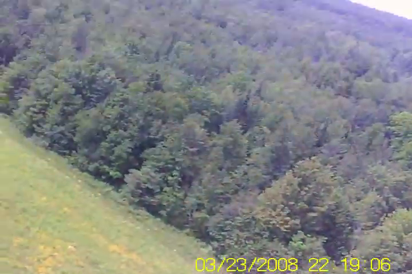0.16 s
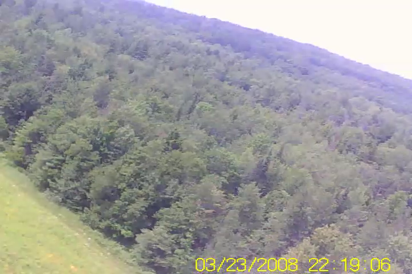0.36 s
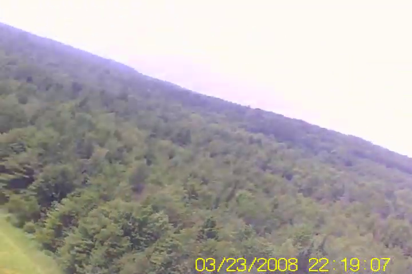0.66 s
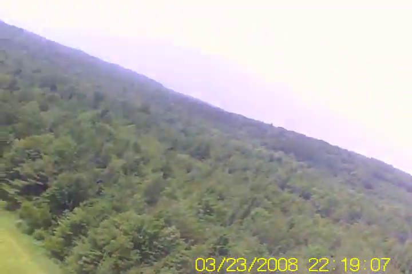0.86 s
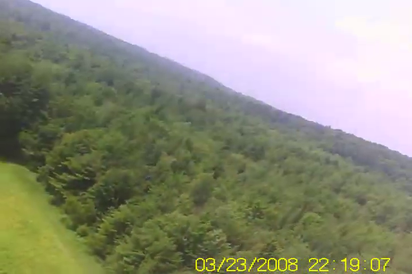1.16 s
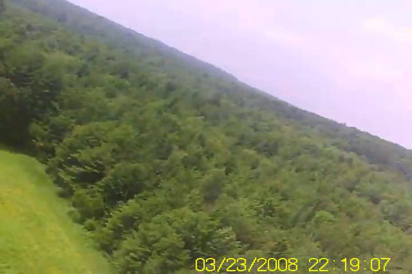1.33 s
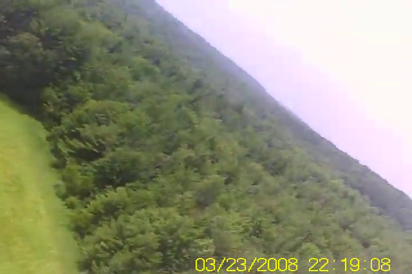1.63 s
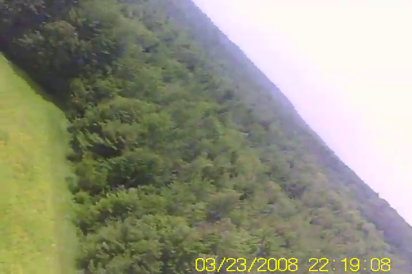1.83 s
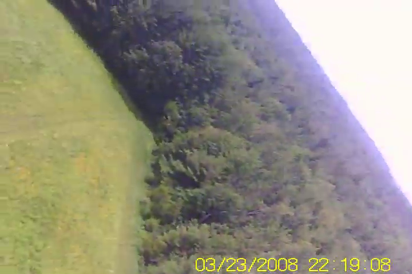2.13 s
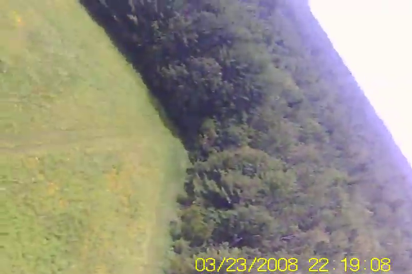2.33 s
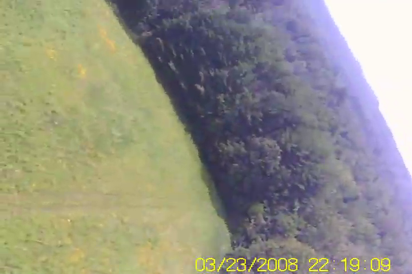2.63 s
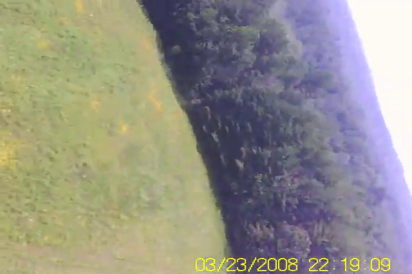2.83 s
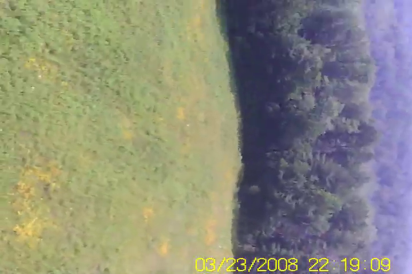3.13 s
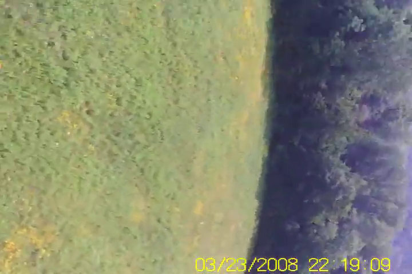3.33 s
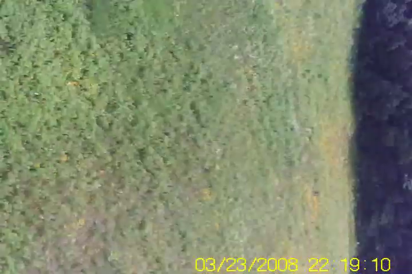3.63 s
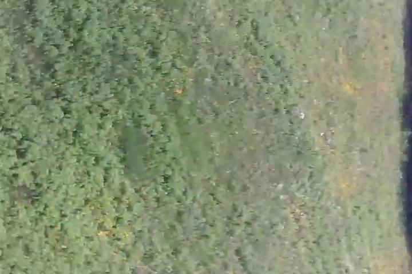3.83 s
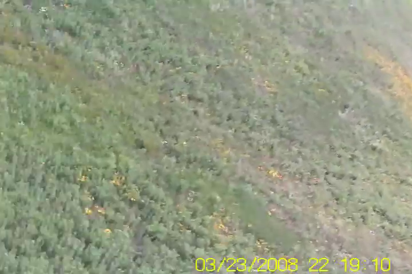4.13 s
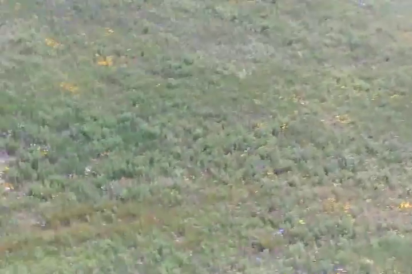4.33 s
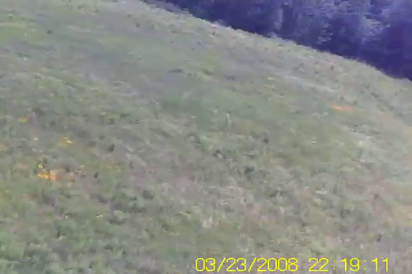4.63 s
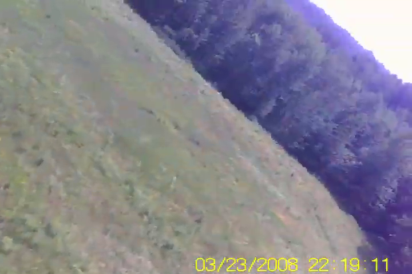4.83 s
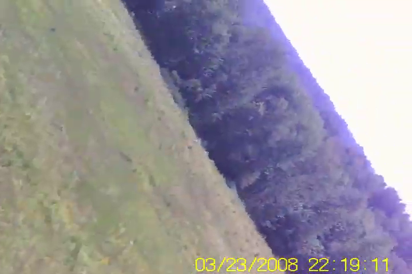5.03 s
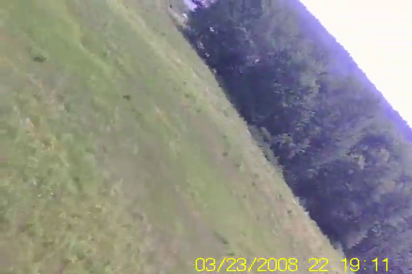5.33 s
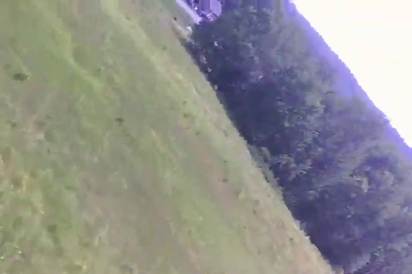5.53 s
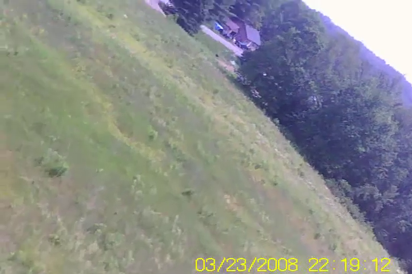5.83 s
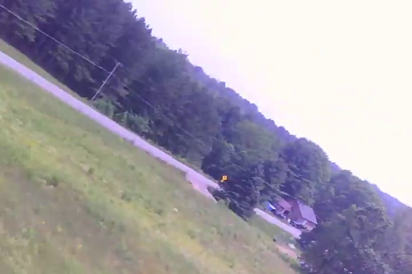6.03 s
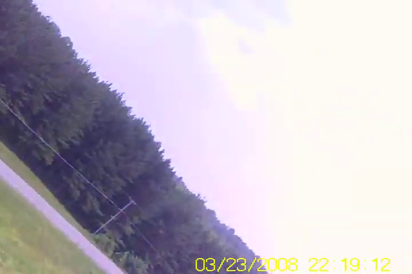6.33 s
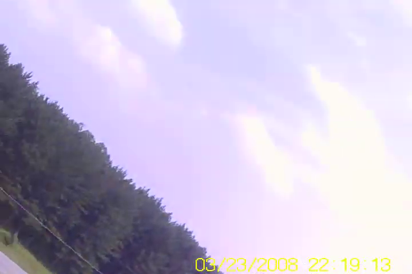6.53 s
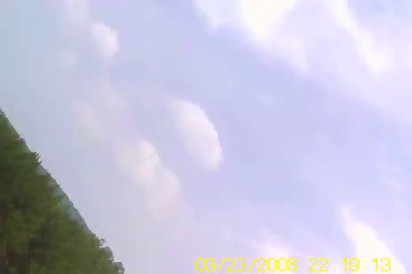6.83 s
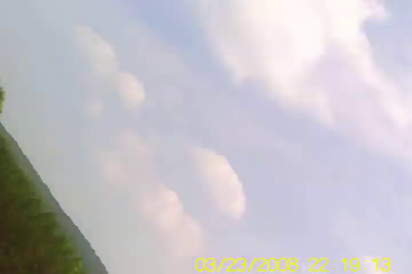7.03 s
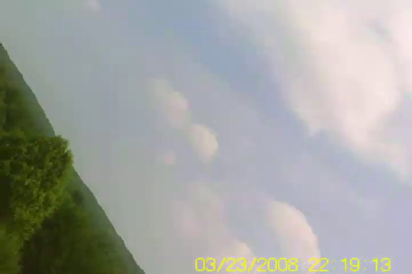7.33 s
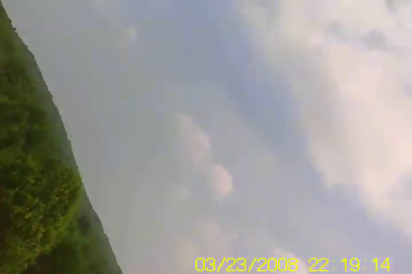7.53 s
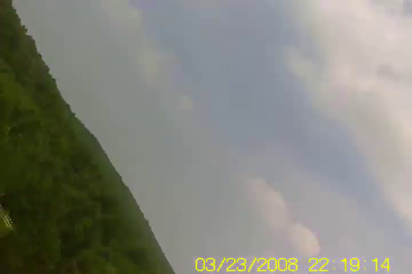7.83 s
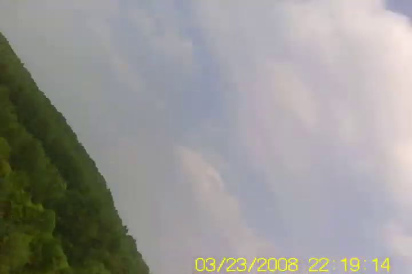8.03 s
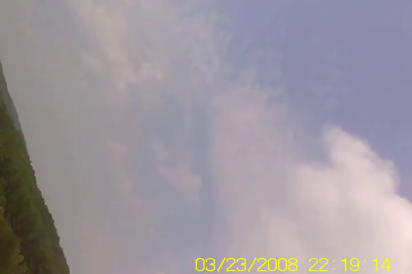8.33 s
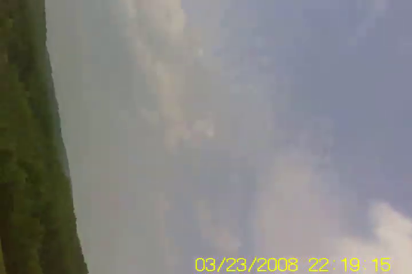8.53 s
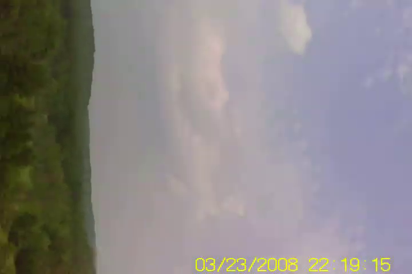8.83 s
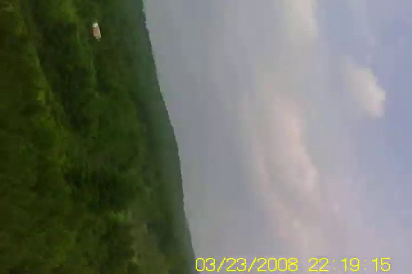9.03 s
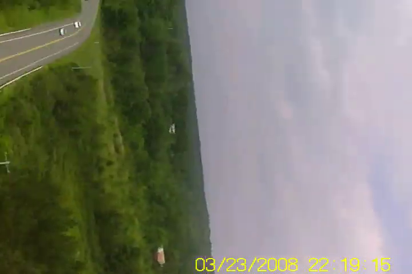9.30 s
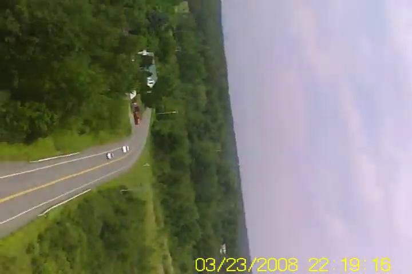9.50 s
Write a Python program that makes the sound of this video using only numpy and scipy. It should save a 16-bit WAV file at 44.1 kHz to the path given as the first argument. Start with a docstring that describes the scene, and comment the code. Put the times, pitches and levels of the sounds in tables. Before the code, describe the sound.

A small electric model airplane is heard from a microphone on board. Its propeller and motor hold a steady, mid-pitched buzzing whine with thin high overtones, over rushing air. At about 0.9 seconds a low thump with a sharp click hits, and the whole sound abruptly becomes much quieter. From 1.5 to 4.5 seconds the wind builds as the plane dives, with rumble, sputtering hiss and a howl that rises and swells in gusts, notably around 3 and 4 seconds. At 4.4 seconds the motor quickly revs up a step with a brief brighter whine. A few low buffets follow, and at 5 seconds the level drops suddenly again. The wind then keeps rushing and gusting, with soft thumps near 5.8, 6.3, 7.1, 7.3 and 8.2 seconds. The whine carries on through it, sagging very slightly in pitch until the end, at about 9.6 seconds.

```python
"""Electric model airplane, heard on board

Motor and two-blade propeller whine steadily, rev up a step, then sag slowly under load.
One airflow, building in a dive, drives rush, howl, hiss and rumble; buffets thump the microphone.
After two of the buffets the whole sound drops abruptly in level."""
import sys
import numpy as np
from scipy import signal
from scipy.fft import rfft, irfft, next_fast_len
from scipy.io import wavfile
from scipy.ndimage import uniform_filter1d, map_coordinates

SR = 44100
rng = np.random.default_rng(int(sys.argv[2]) if len(sys.argv) > 2 else 0)


def wav_out(sig):
    """Save sig, one row per channel (or a flat mono array), as 16-bit PCM at SR to the path in sys.argv[1]."""
    wavfile.write(sys.argv[1], SR, np.round(np.clip(np.atleast_2d(sig).T, -1, 1) * 32767).astype(np.int16))


N = 426006

# airflow strength: t/s, level/dB re level flight
AIRFLOW = [(0, -16), (1.2, -17.5), (2.15, -11.5), (2.6, -7), (3.5, -3), (4.6, 0.73), (5.03, -2), (5.35, 0),
           (6.05, 2.6), (6.7, -1.5), (7.1, 0.85), (7.5, -0.34), (8.2, 0.27), (8.7, -1.7), (9.25, 0.3),
           (9.65, 0)]


def rotation():
    """Blade-pass phase/rad and rate/Hz; uneven load makes the speed tremble."""
    # cruise, rev, sag: t/s, f/Hz
    blade_rate = [(0, 503), (.8, 502.8), (2.9, 501.3), (3.6, 501.3), (4.345, 501.7), (4.42, 546),
                  (4.47, 555.4), (4.56, 557.9), (5.05, 556.8), (6.1, 555.4), (6.9, 552.7), (8, 550.7),
                  (9.2, 548), (9.65, 547.3)]
    blade_hz = curve(blade_rate)
    tremble = 1 + .0003 * wobble(25) + .00059 * wobble(150)
    return 2 * np.pi * np.cumsum(blade_hz * tremble) / SR, blade_hz


def propeller(phase):
    """Blade passes make four harmonics that swell and fade as the plane turns."""
    # harmonics 1-4: t/s, level/dB
    first = [(0, -21), (.8, -21), (2.45, -17.5), (3.35, -18.5), (3.95, -25.5), (4.35, -32), (4.5, -24.5),
             (5.25, -20.5), (6.55, -25), (6.95, -17.5), (7.3, -16.3), (8.03, -28), (8.35, -20),
             (9.65, -19.5)]
    second = [(0, -38.5), (.65, -38.5), (1.4, -30), (2, -28.5), (3.1, -34), (3.85, -22.5), (4.55, -25.5),
              (5.15, -16.8), (5.75, -25.5), (6.03, -40), (6.6, -19.5), (7, -15.5), (8, -22.5), (8.4, -17.5),
              (9.25, -19.5), (9.65, -17.5)]
    third = [(0, -29), (.8, -33), (1.75, -45), (3.45, -28), (4.15, -29.5), (4.6, -22), (5.1, -33),
             (5.45, -26), (6.3, -25.5), (7, -30), (9, -31), (9.65, -27)]
    fourth = [(0, -26), (.9, -31), (2.1, -43), (4.1, -45), (4.6, -37), (5.7, -38), (6.3, -28), (6.65, -38),
              (7.2, -32), (7.9, -39), (8.4, -31), (9.65, -34)]
    return sum(amp(curve(level)) * tone(k * phase, flutter_db=.64, rough=.017)
               for k, level in enumerate([first, second, third, fourth], 1))


def motor(phase):
    """Magnets passing stator teeth whine at 6 and 12 cycles per blade pass."""
    # t/s, level/dB
    low_whine = [(0, -41), (.6, -37), (1.2, -43.5), (2.5, -37.5), (3.6, -31), (4.36, -32), (4.41, -22),
                 (4.46, -23), (4.55, -36), (5.1, -35), (5.4, -28.5), (7.1, -25), (9.65, -22.8)]
    high_whine = [(0, -27.5), (3.4, -29), (4.2, -34), (4.55, -25), (6.1, -28.5), (7.1, -26), (9.65, -24)]
    return sum(amp(curve(level)) * tone(k * phase, flutter_db=.35, rough=.14)
               for k, level in [(6, low_whine), (12, high_whine)])


def overtones(phase, blade_hz):
    """Faint harmonics shift against the airframe's resonances as the speed changes."""
    # blade rate at cruise, sagged, high and top speed: f/Hz
    stages_hz = [502, 548, 556.3, 557.2]
    # harmonic, level/dB at each of the four stages, slope/(dB per dB of flow)
    partials = [(5, -43.5, -37, -39, -40, -.3), (7, -43.5, -39, -47, -43, .2), (8, -44, -39, -39, -39, .55),
                (9, -35.5, -46, -43, -52, 0.2), (10, -52, -42, -46, -40, 0),
                (11, -43.5, -39, -48, -46, -0.3), (17, -53, -46, -54, -54, 1),
                (18, -40.5, -38, -51, -51, -0.05)]
    out = np.zeros(N)
    for k, *stage_db, slope in partials:
        level_db = flow_db(np.interp(blade_hz, stages_hz, stage_db), slope)
        out += amp(level_db) * tone(k * phase, flutter_db=.6, rough=.29)
    return out


def slipstream(gust, eddies):
    """Turbulent air rushes over the airframe."""
    # f/Hz, level/dB
    spectrum = [(40, -13), (170, -1.5), (400, -2.5), (800, -3.3), (1700, -5.5), (2150, -10.5), (4000, -14),
                (5200, -18.5), (6700, -20), (7600, -24.5), (10000, -30), (11000, -36.5), (12000, -49),
                (12600, -100)]
    level_db = flow_db(-13, slope=.93) + .18 * gust + .47 * eddies
    return amp(level_db) * turbulence(spectrum, patchy_db=.46)


def wind_rumble(gust):
    """Wind on the microphone rumbles, swelling in gusts."""
    # f/Hz, level/dB
    spectrum = [(4, -2), (12, 2), (25, -2.5), (45, -6), (80, -9), (140, -15), (300, -28.5), (900, -60)]
    _, swell_db = gust_swells()
    level_db = flow_db(-14.2, slope=.53) + swell_db + .62 * gust + .66 * wobble(22)
    return amp(level_db) * turbulence(spectrum, patchy_db=-.5)


def edge_howl(gust):
    """Air shedding off an edge howls, swelling in gusts."""
    swell_db, _ = gust_swells()
    level_db = flow_db(-22, slope=.9) + swell_db + .5 * gust
    return amp(level_db) * shedding(base_hz=1250, octaves_per_db=.045, width_hz=280)


def buffets():
    """Each buffet is one low thump; two sharp overload ticks sound on top of the first."""
    # t/s, length/s, level/dB
    thumps = [(.893, .018, -6), (4.83, .025, -7), (4.899, .019, -6), (4.999, .021, 0), (5.821, .017, 0),
              (6.335, .018, -2), (7.098, .017, 4), (7.304, .019, -1), (8.215, .02, -2)]
    # t/s, level/dB
    overload_ticks = [(.8917, 3), (.8937, 2)]
    t, out = np.arange(N) / SR, np.zeros(N)
    for at_s, length_s, db in thumps:
        out -= amp(db) * np.cos(np.pi * np.clip((t - at_s) / length_s, -.5, .5))
    spike = np.array([.3, .9, 1, .9, .3])
    for at_s, db in overload_ticks:
        start = round(at_s * SR) - 2
        out[start:start + len(spike)] += amp(db) * spike
    return out


def propeller_wash(phase):
    """Turbulent wash, chopped by the blades."""
    # f/Hz, level/dB
    spectrum = [(40, -7), (120, -3.5), (330, -3.5), (650, -2), (1200, -8.5), (2300, -12.5), (3600, -13.5),
                (5000, -14.8), (6000, -12.5), (7300, -18.5), (9600, -25), (11000, -34.5), (12000, -51),
                (12600, -100)]
    chop = 1 + .17 * np.cos(phase)
    return amp(flow_db(-25.5, slope=-.27)) * unit(chop * turbulence(spectrum, patchy_db=.2))


def airframe_drone():
    """A thicker part of the airframe sheds slower eddies: a low drone."""
    # t/s, level/dB
    level = [(0, -33), (1.4, -27), (3.2, -27.5), (4.2, -37), (6.1, -42), (6.8, -32), (8, -30.5),
             (9.65, -33)]
    return amp(curve(level)) * shedding(base_hz=285, octaves_per_db=.04, width_hz=52)


def wind_hiss(gust, eddies):
    """Hiss at the microphone; the smallest eddies make it sputter."""
    # f/Hz, level/dB
    spectrum = [(1500, -25), (4000, -1.5), (7000, -1), (10000, 3), (11000, -10), (12000, -22), (12600, -80)]
    level_db = flow_db(-34.5, slope=1.6) + .62 * gust + 2 * eddies
    return amp(level_db) * turbulence(spectrum, patchy_db=1)


def gust_swells():
    """Gusts as Gaussian humps of level: howl/dB, rumble/dB."""
    # t/s, half-width/s, howl level/dB, rumble level/dB
    gusts = [(2.5, 0.098, 4, 1), (2.783, .1, 10.5, -2.5), (3.013, .07, 9, -1), (3.5, 0.21, 6.5, 0),
             (4.067, 0.14, 5.5, 1.5), (4.6, 0.1, 3, 2), (5, .08, 1, 2.5), (5.45, 0.18, -3, 2.5),
             (5.95, 0.17, 1.5, 3), (6.35, .12, 0, 3), (7.122, .2, -2, 5), (7.72, 0.17, 4.5, 2.5),
             (8.17, 0.19, 5, 3), (8.45, 0.18, -3.5, 3), (9.2, 0.34, 4, 2)]
    t = np.arange(N) / SR
    return sum(np.outer(db, np.exp(-((t - at_s) / width_s) ** 2)) for at_s, width_s, *db in gusts)


def tone(phase, flutter_db, rough):
    """Partial of rms 1; gusty inflow makes it flutter and adds a narrow noise skirt."""
    skirt = rough * (wobble(420) + 1j * wobble(420))
    carrier = np.exp(1j * (phase + rng.uniform(0, 2 * np.pi)))
    return unit(amp(flutter_db * wobble(16)) * np.real((1 + skirt) * carrier))


def shedding(base_hz, octaves_per_db, width_hz, reach_hz=9000):
    """Noise band of rms 1; faster air sheds eddies faster and raises its centre."""
    skirt = lambda hz: (hz < reach_hz) / (1 + (hz / width_hz) ** 2)
    a, b = (filtered(rng.standard_normal(N), skirt) for _ in range(2))
    centre_hz = base_hz * 2 ** (octaves_per_db * curve(AIRFLOW))
    phase = 2 * np.pi * np.cumsum(centre_hz) / SR
    return unit(a * np.cos(phase) + b * np.sin(phase))


def turbulence(spectrum, patchy_db):
    """Shaped noise of rms 1; eddies make patches of random gain."""
    bins = signal.stft(rng.standard_normal(N), nperseg=512)[2]
    patches = uniform_filter1d(rng.standard_normal(bins.shape), size=7, axis=0)
    patches = uniform_filter1d(patches, size=12, axis=1)
    noise = signal.istft(bins * amp(patchy_db * unit(patches)), nperseg=512)[1][:N]
    knots_hz, db = np.transpose(spectrum)
    response = lambda hz: amp(np.interp(np.log(hz + 1), np.log(knots_hz), db, right=-120))
    return unit(filtered(noise, response))


def flow_db(base_db, slope):
    """Level/dB following the airflow; slope in dB per dB."""
    return base_db + slope * curve(AIRFLOW)


def amp(db):
    """dB to gain."""
    return 10 ** (np.asarray(db) / 20)


def unit(x):
    """Scale to rms 1."""
    return x / np.sqrt(np.mean(x ** 2) + 1e-20)


def curve(rows):
    """Rows of (t/s, value), interpolated per sample."""
    return np.interp(np.arange(N) / SR, *np.transpose(rows))


def wobble(rate_hz):
    """Smooth random curve with knots at rate_hz."""
    knots = rng.standard_normal(int(N * rate_hz / SR) + 4)
    return map_coordinates(knots, [np.arange(N) * rate_hz / SR])


def filtered(x, response):
    """FFT filter with gain response(f/Hz)."""
    size = next_fast_len(N + SR // 2)
    return irfft(rfft(x, size) * response(np.fft.rfftfreq(size, 1 / SR)), size)[:N]


def scene():
    """Drive and wind under one overall level, mono."""
    # two abrupt drops, partial recovery between: t/s, level/dB
    overall = [(0, 0), (.902, 0), (.903, -12.3), (1.15, -12.3), (2.5, -8), (5.011, -8), (5.014, -15)]
    phase, blade_hz = rotation()
    drive = propeller(phase) + motor(phase) + overtones(phase, blade_hz)
    gust, eddies = wobble(9), wobble(70)
    wind = propeller_wash(phase) + slipstream(gust, eddies) + edge_howl(gust)
    wind += wind_hiss(gust, eddies) + wind_rumble(gust) + airframe_drone() + buffets()
    return (amp(curve(overall)) * (drive + wind))[None]


def record(dry):
    """Hard peak limit, then a steep low-pass."""
    cutoff_hz = 16000
    limited = np.clip(dry[0], -.75, .85)
    return filtered(limited, lambda hz: 1 / np.sqrt(1 + (hz / cutoff_hz) ** 60))[None]


dry = scene()
out = record(dry)
wav_out(out)
```